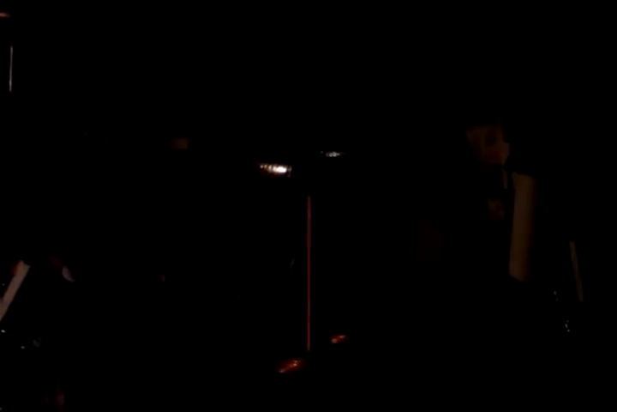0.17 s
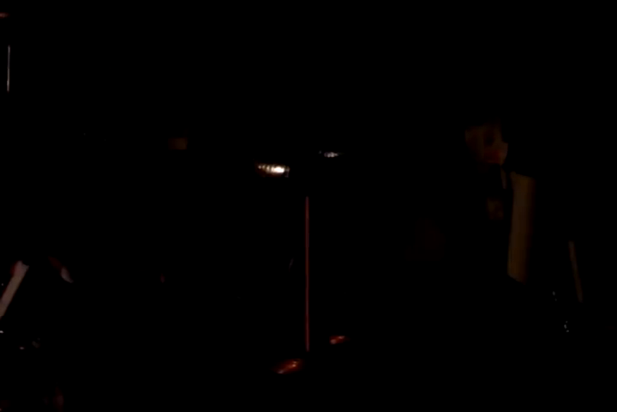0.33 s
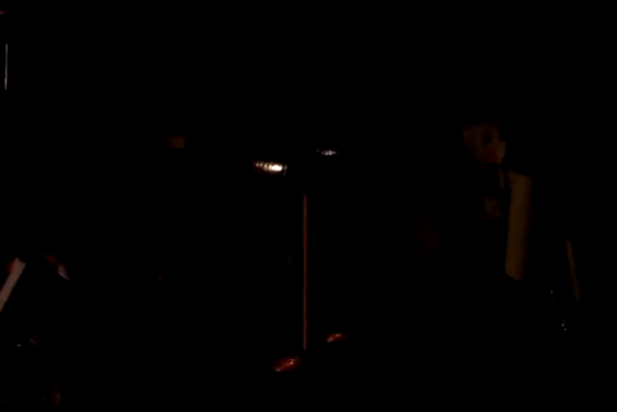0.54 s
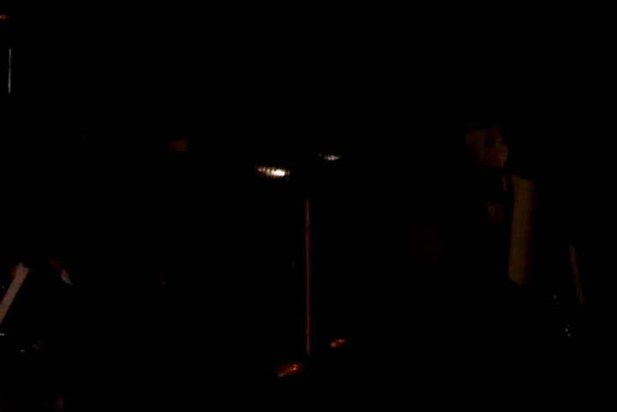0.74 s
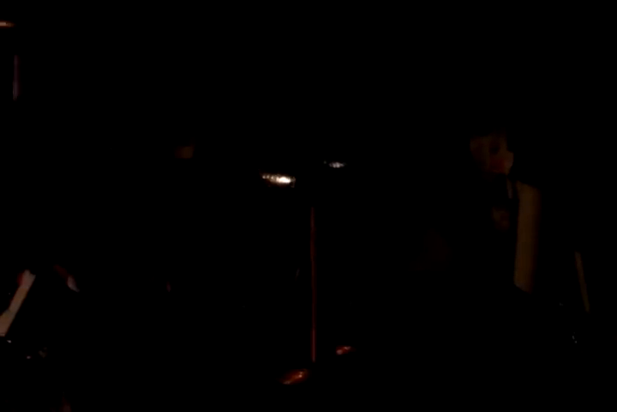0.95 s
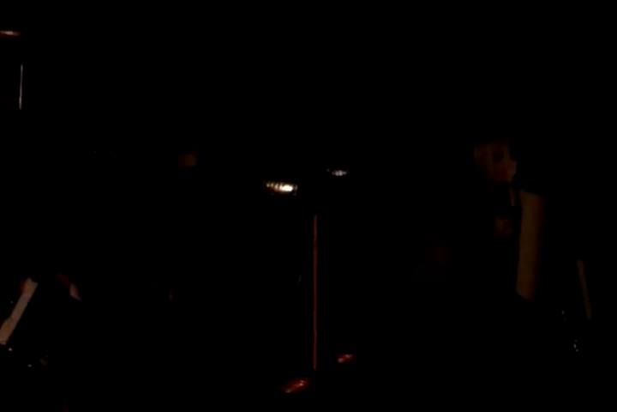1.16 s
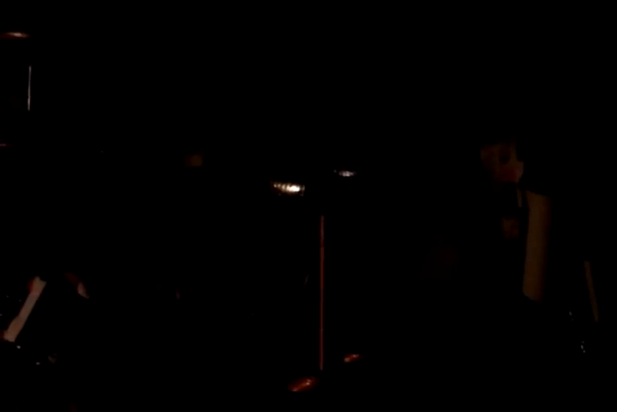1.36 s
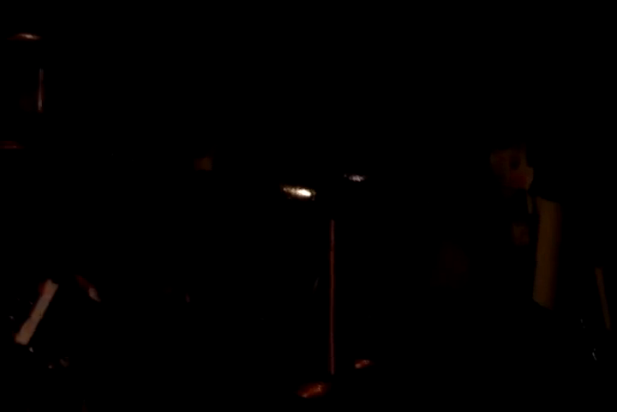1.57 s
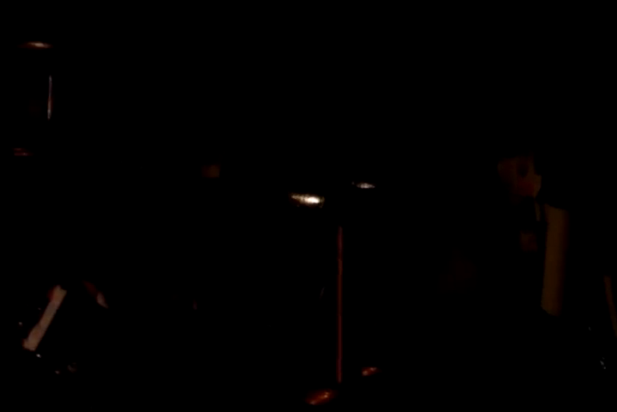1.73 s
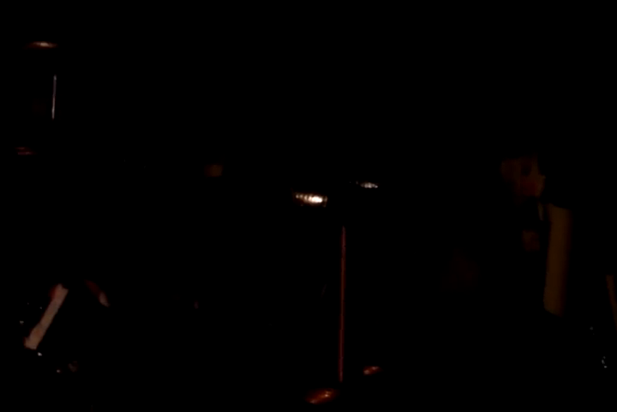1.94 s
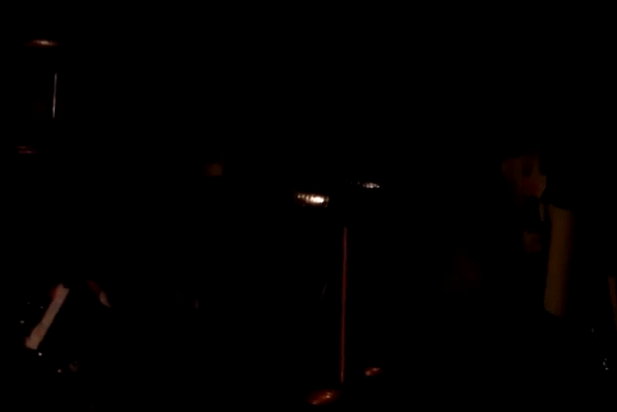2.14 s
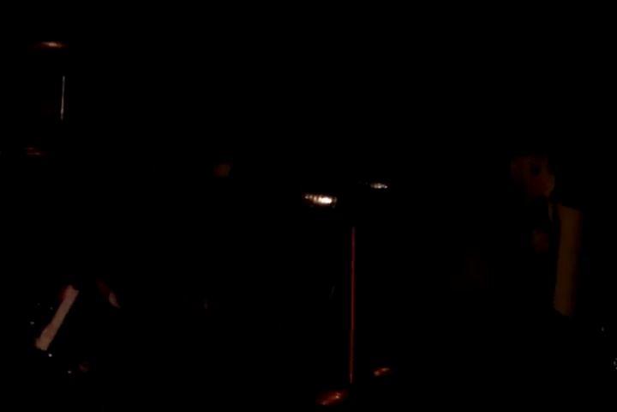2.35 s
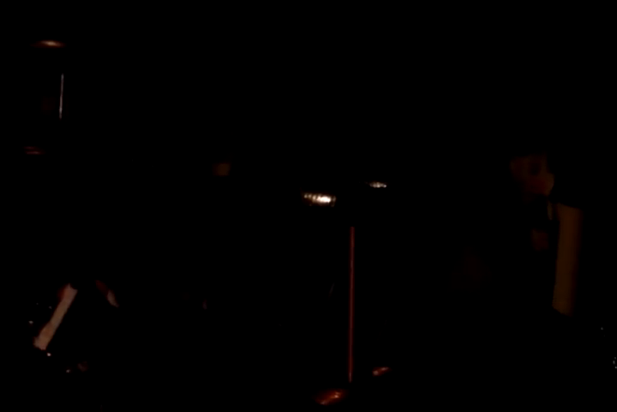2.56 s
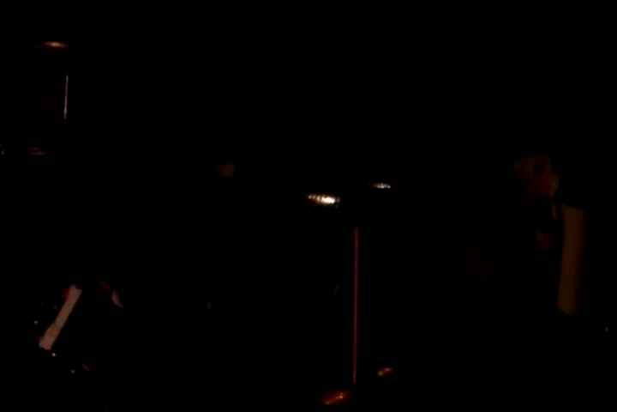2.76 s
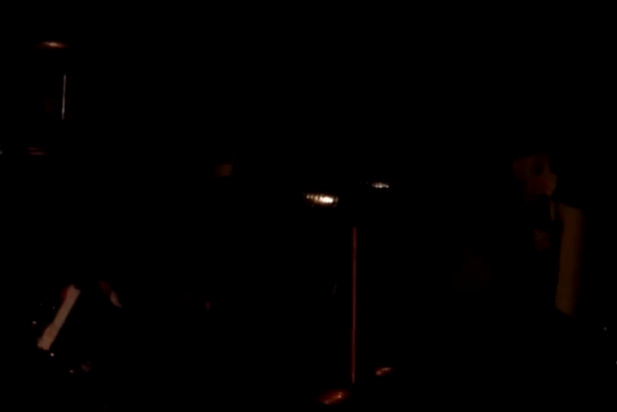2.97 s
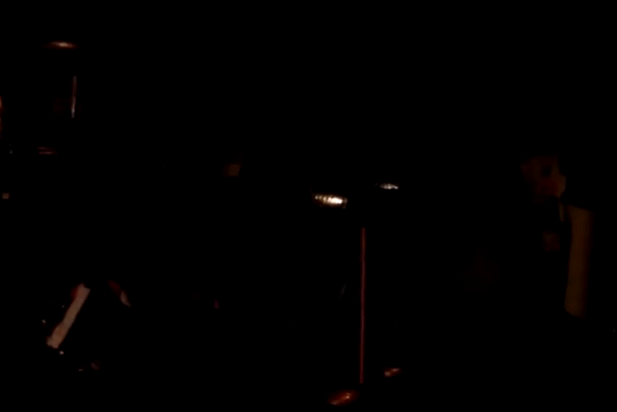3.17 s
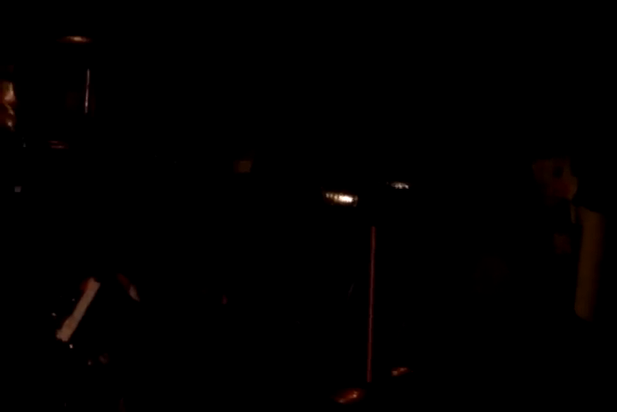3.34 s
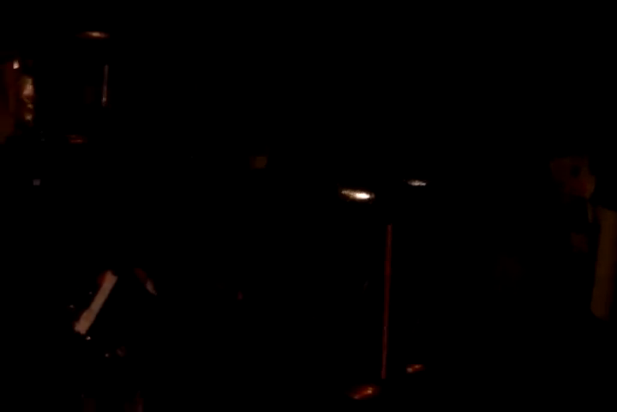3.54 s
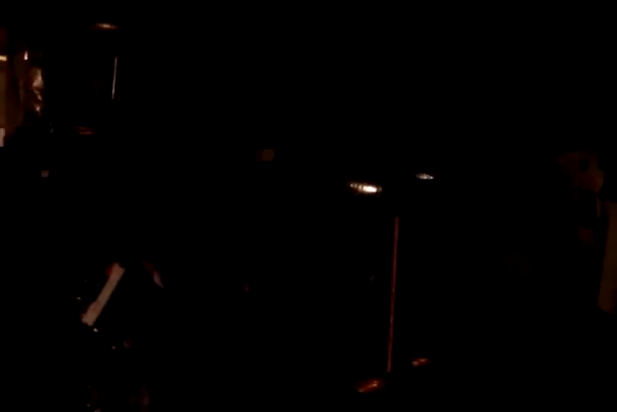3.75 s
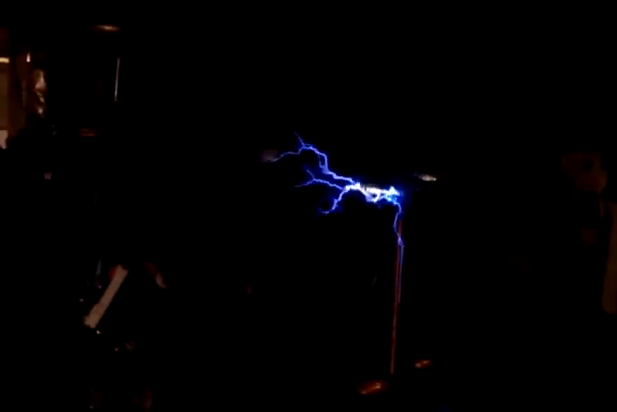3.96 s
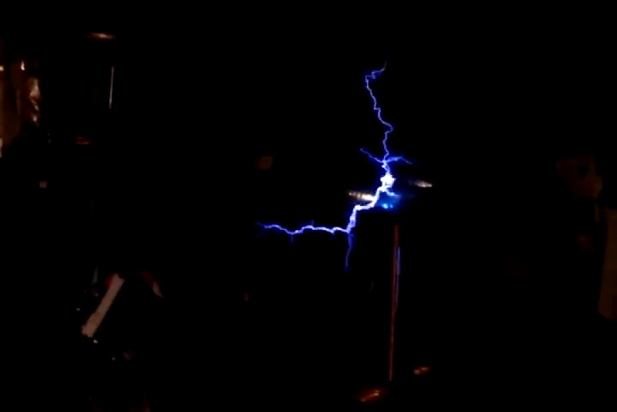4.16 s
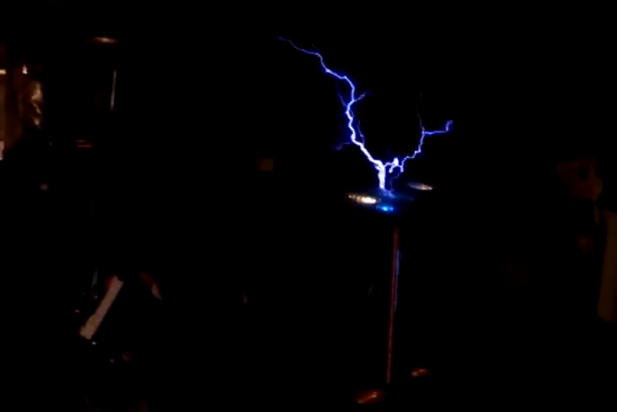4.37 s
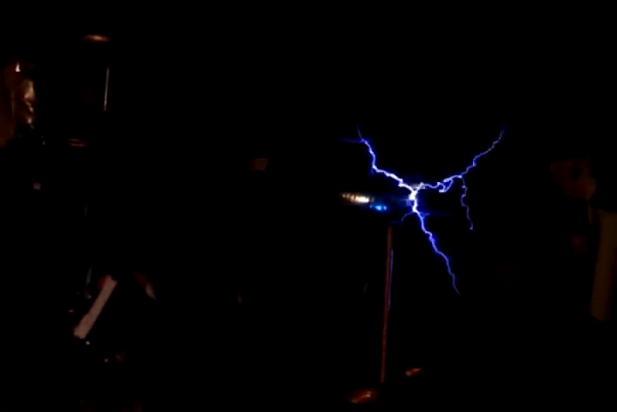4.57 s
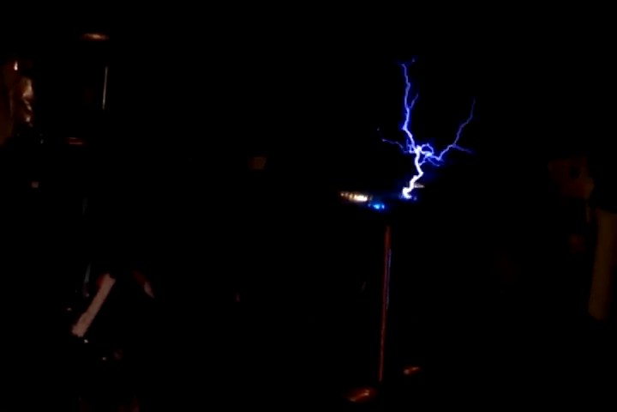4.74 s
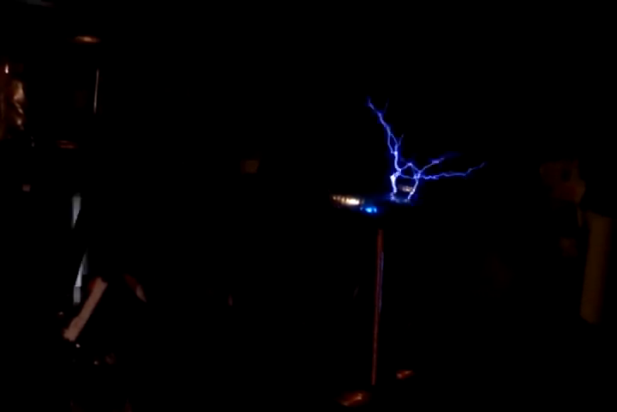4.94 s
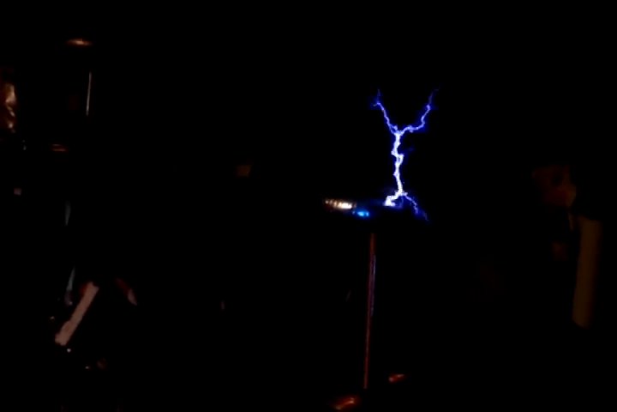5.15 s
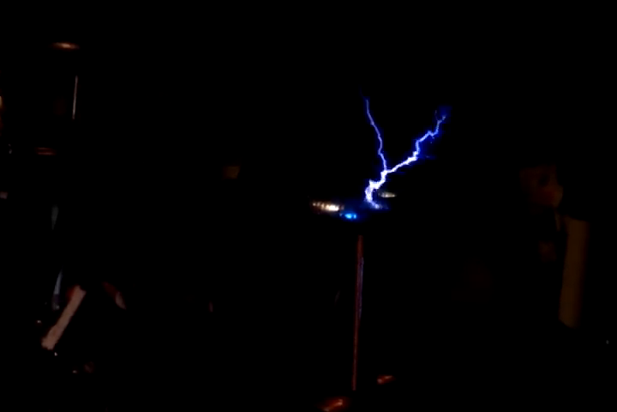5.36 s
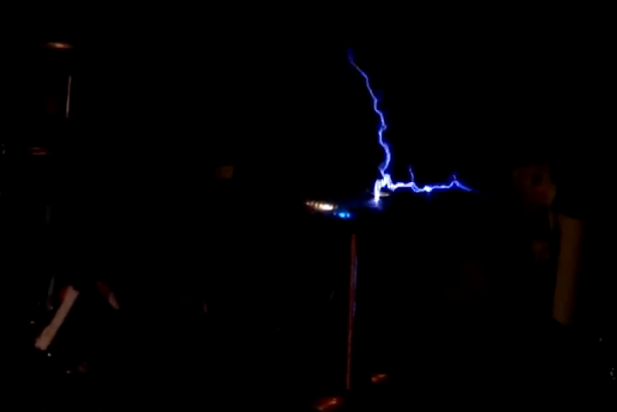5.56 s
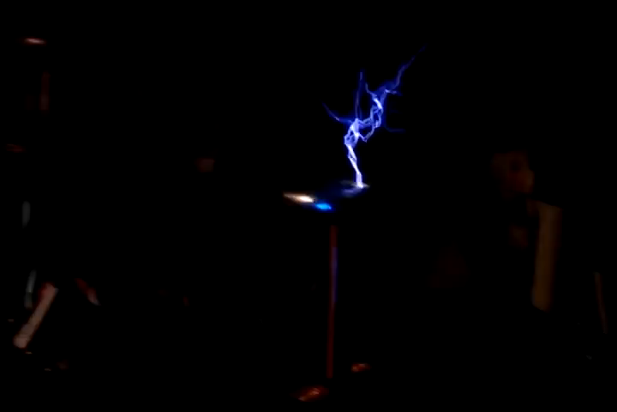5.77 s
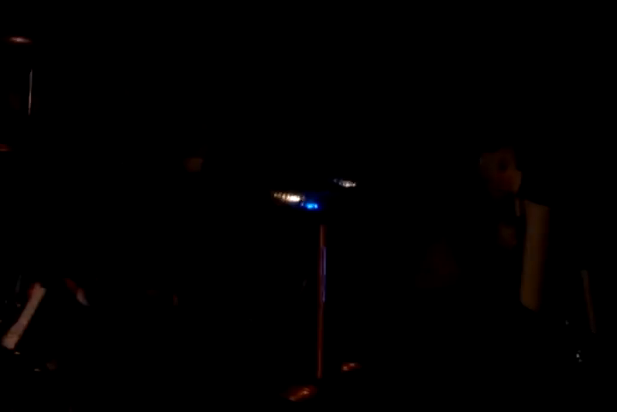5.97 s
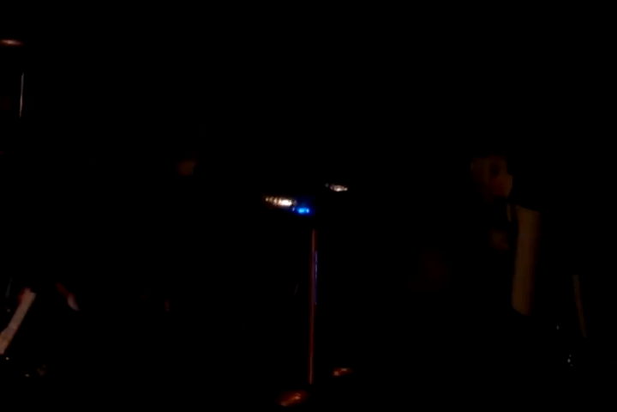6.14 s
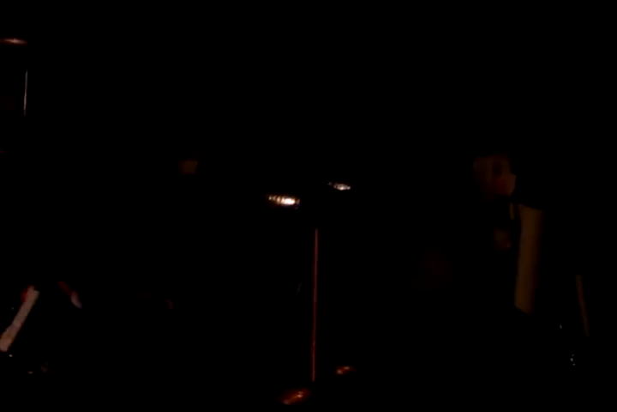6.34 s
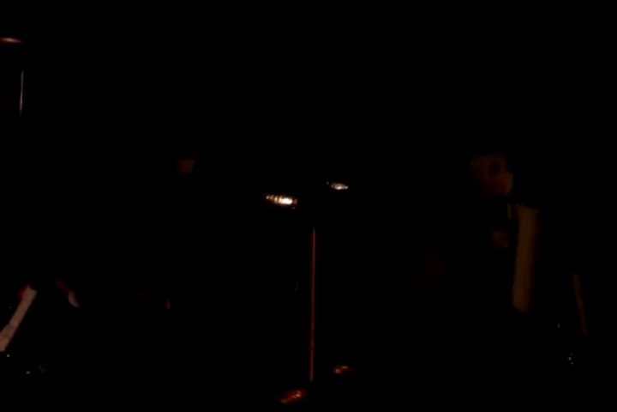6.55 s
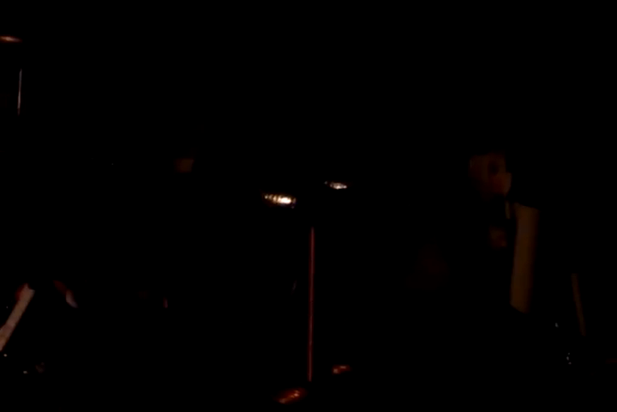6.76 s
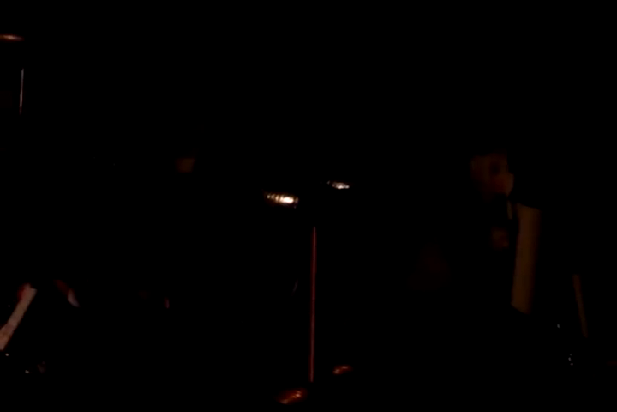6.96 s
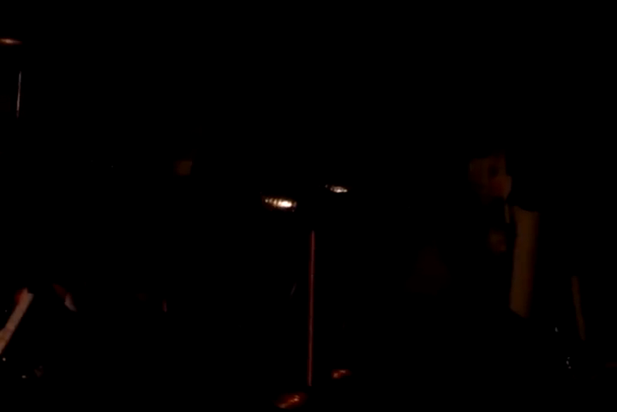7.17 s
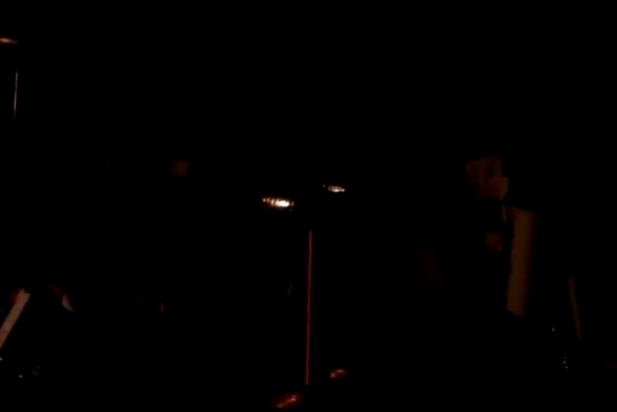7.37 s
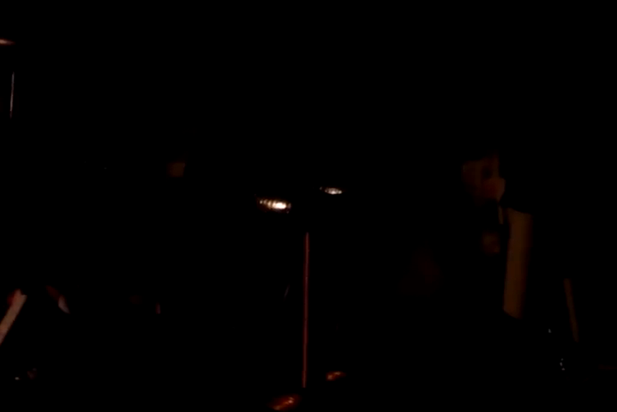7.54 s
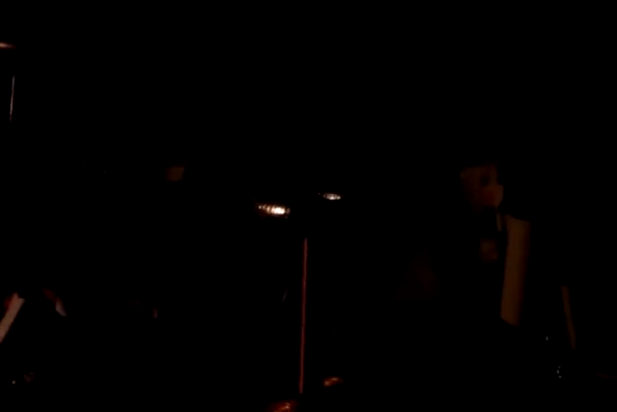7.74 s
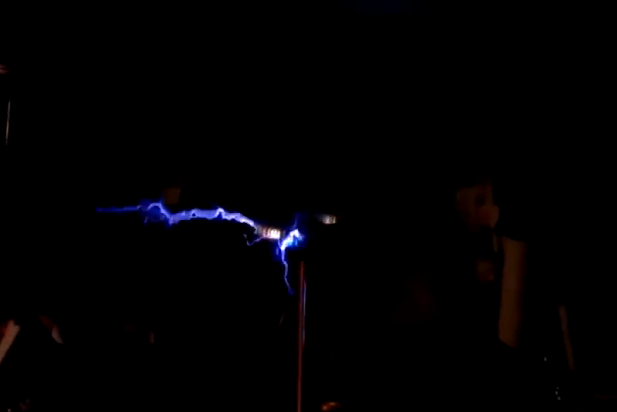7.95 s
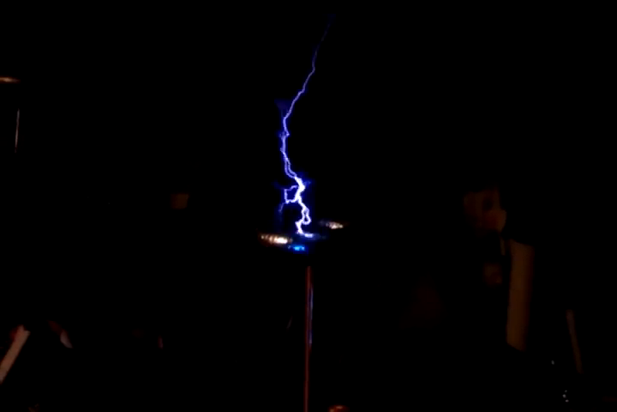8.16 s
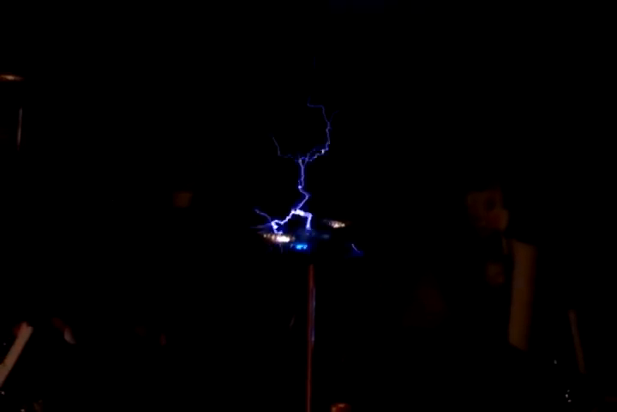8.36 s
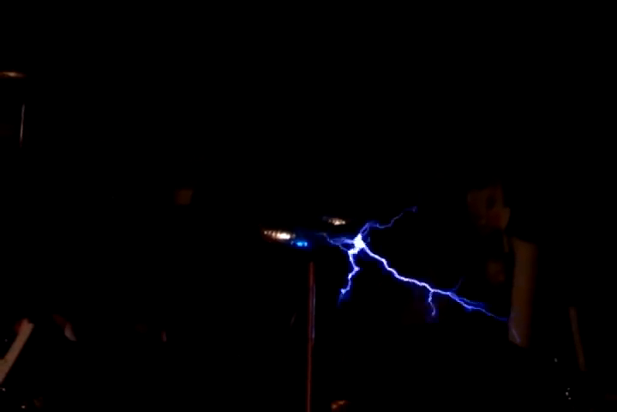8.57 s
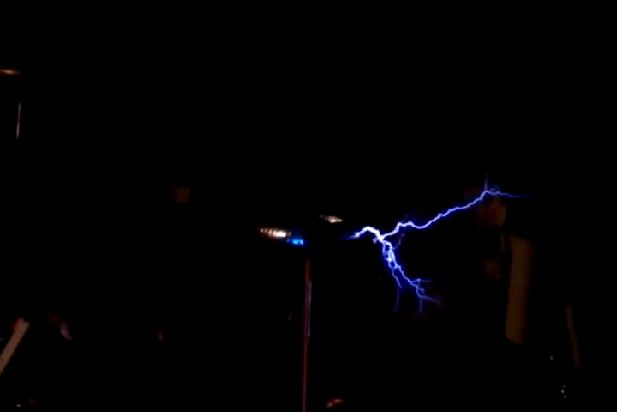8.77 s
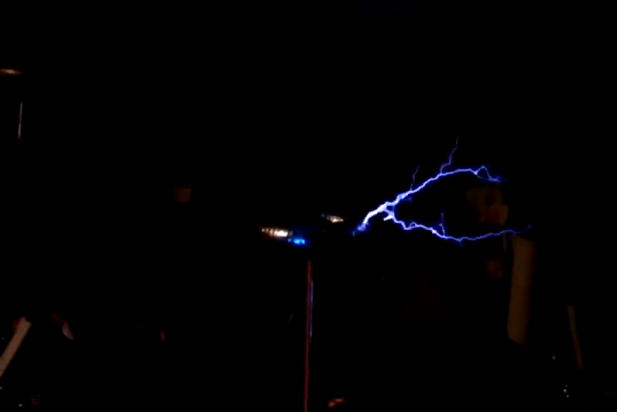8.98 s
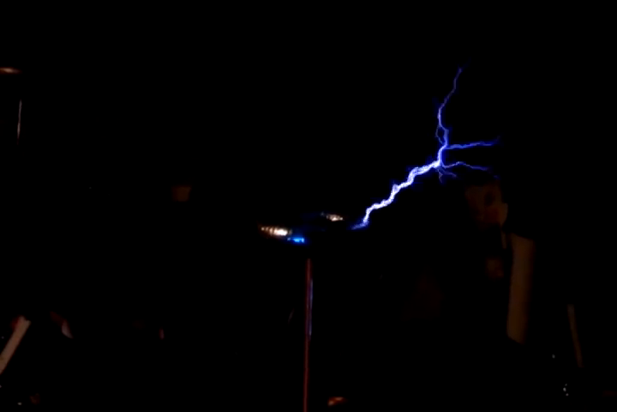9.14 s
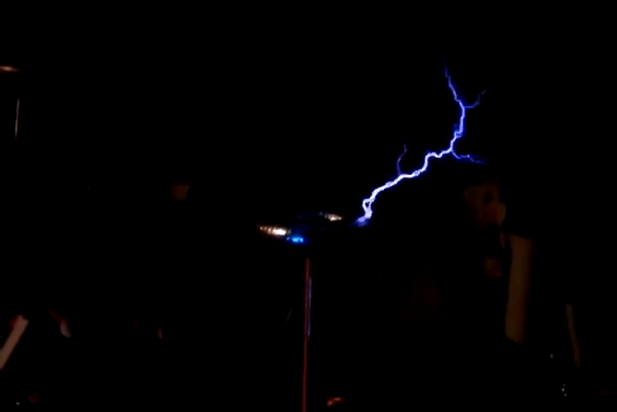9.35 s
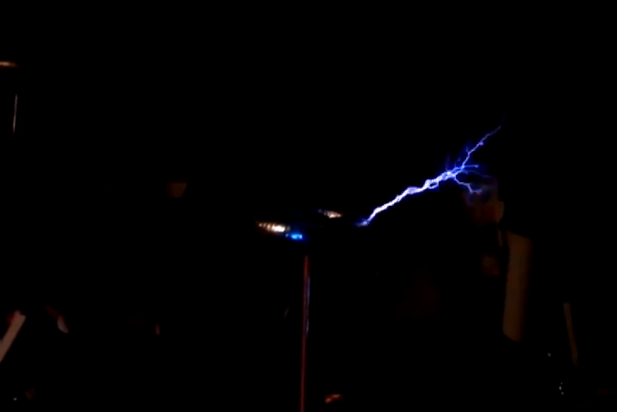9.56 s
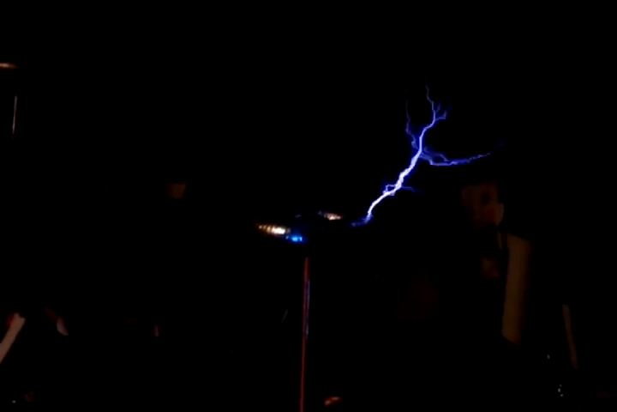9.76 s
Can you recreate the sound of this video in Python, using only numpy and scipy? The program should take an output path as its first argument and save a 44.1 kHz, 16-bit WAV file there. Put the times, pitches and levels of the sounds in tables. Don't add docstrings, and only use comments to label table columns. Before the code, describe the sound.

Steady motor whine and airy blower noise, broken by two harsh runs of loud buzzing, crackling electric arcs, each ducking the whine afterwards.

```python
import sys
import numpy as np
from scipy import signal
from scipy.fft import rfft, irfft, next_fast_len
from scipy.io import wavfile

SR = 44100
rng = np.random.default_rng(int(sys.argv[2]) if len(sys.argv) > 2 else 0)


def log_audio(samples):
    frames = np.atleast_2d(samples).T
    limited = np.clip(frames, -1, 1)
    pcm = np.round(limited * 32767).astype(np.int16)
    wavfile.write(sys.argv[1], SR, pcm)


def magnitude_from_level(level_db):
    exponent = np.asarray(level_db, float) / 20
    return 10 ** exponent


N = 432621
LEAD_S = .4
MAINS_BEAT_HZ = 119.9


def clock():
    return np.arange(-round(LEAD_S * SR), N) / SR


def rms_one(x):
    return x / np.sqrt(np.mean(x ** 2) + 1e-20)


def at_hz(points, hz):
    point_hz, value = np.array(points).T
    return np.interp(np.log(hz + 1), np.log(point_hz), value)


def coloured(x, points, lifts=()):
    length = x.shape[-1]
    size = next_fast_len(length)
    hz = np.arange(size // 2 + 1) * SR / size
    level_db = at_hz(points, hz)
    for centre, width, lift_db in lifts:
        level_db = level_db + lift_db / (1 + (2 * (hz - centre) / width) ** 2)
    return irfft(rfft(x, size) * magnitude_from_level(level_db), size)[..., :length]


def resonance(x, hz, width_hz):
    r = np.exp(-np.pi * width_hz / SR)
    top = (1 - r * r) / 2
    return signal.lfilter([top, 0, -top], [1, -2 * r * np.cos(2 * np.pi * hz / SR), r * r], x)


def filtered(x, order, hz, kind="low"):
    return signal.sosfilt(signal.butter(order, hz, kind, fs=SR, output="sos"), x)


def drift(rate_hz):
    slow = resonance(rng.standard_normal(len(clock())), rate_hz, rate_hz)
    return rms_one(resonance(slow, rate_hz, 2 * rate_hz))


def fading(since_s, time_s):
    return np.exp(-np.maximum(since_s, 0) / time_s) * (since_s >= 0)


MOTOR_HZ = [
    693.9,
    1387.8,
    2081.7,
    404.6,
]
# level in dB, share that differs between left and right in dB.
MOTOR_TONES = [(1, -18), (-23.5, -15), (-33.5, -2), (-15, -21)]


def motor():
    t, out = clock(), 0
    wander_s = .00006 * drift(2.63)
    for hz, (db, side_db) in zip(MOTOR_HZ, MOTOR_TONES):
        phase = 2 * np.pi * hz * (t + wander_s)
        swell = np.sqrt(2) * magnitude_from_level(db - 3 + 0.58 * drift(6.6))
        side = magnitude_from_level(side_db) * np.sin(phase - .2) * [[1], [-1]]
        out = out + swell * (np.sin(phase) + side)
    return out


# frequency in Hz, width in Hz, level in dB.
HOUSING = [(134.2, 10.4, -18), (195, 25, -26), (389, 27, -25), (402, 20, -24), (504.4, 42, -22),
           (1025, 25, -27), (1097, 22, -29), (1192, 32, -22.5), (1932, 27, -32), (3600, 150, -32.5),
           (8380, 300, -36)]
# frequency in Hz, density in dB per Hz.
BLOWER_NEAR = [(25, -36), (80, -5), (130, 4.5), (350, 1.5), (800, -5), (1300, -12), (2200, -28.5),
               (4000, -25), (7000, -44.5), (16000, -30.5)]
# frequency in Hz, density in dB per Hz.
BLOWER_DIFFUSE = [(60, -24), (130, -7), (500, -21), (1200, -10), (1800, -5), (2800, -13), (4000, -18),
                  (6500, -23), (8000, -19.5), (10000, -23), (11800, -28), (15500, -24.5)]


def blower():
    air = rng.standard_normal((4, len(clock())))
    near = magnitude_from_level(-16) * rms_one(coloured(air[1], BLOWER_NEAR))
    for hz, width, db in HOUSING:
        ring = resonance(resonance(air[0], hz, width), hz, 2 * width)
        near = near + magnitude_from_level(db) * rms_one(ring)
    diffuse = magnitude_from_level(-13.5) * rms_one(coloured(air[2:], BLOWER_DIFFUSE))
    return near * magnitude_from_level(np.array([[.3], [-.3]])) + diffuse


# time in seconds, level in dB.
SWITCH = [
    (-.4, -30),
    (3.9035, -10),
    (7.9112, -14),
]
# first arc in seconds, arcs steady in seconds, power off in seconds,
# shortfall while the arc catches in dB.
RUNS = [
    (-.39, -.38, -.045, 0),
    (3.9322, 4.008, 6.29, -5.5),
    (7.9502, 7.972, 9.9, -1.5),
]
GAIN_TOP_DB, GAIN_ARC_DB, SNAP_LIMIT_DB = -14.4, -37.5, -32.5
DUCK_LAG_S, DUCK_S, RECOVER_DB_PER_S = .002, .012, 9.8


def gain_control():
    t = clock()
    db = np.full(len(t), float(GAIN_TOP_DB))
    for (closed, snap_db), (struck_s, _, off, _) in zip(SWITCH, RUNS):
        above_arc_db = SNAP_LIMIT_DB - snap_db - GAIN_ARC_DB
        ducked = GAIN_ARC_DB + above_arc_db * fading(np.maximum(t - struck_s, 0), DUCK_S)
        recovering = ducked + RECOVER_DB_PER_S * np.maximum(t - off, 0)
        db = np.where(t >= closed + DUCK_LAG_S, np.minimum(db, recovering), db)
    return magnitude_from_level(db)


def struck(events):
    clicks = np.full(len(clock()), 1e-18)
    for s, db in events:
        clicks[round((s + LEAD_S) * SR)] = magnitude_from_level(db)
    return clicks


# frequency in Hz, time to fall 60 dB in seconds.
ROOM_T60 = [(500, 0.15), (3000, 0.13), (8000, 0.28), (15000, .24)]


def room(x):
    t, echoes = np.arange(SR // 2) / SR, 0
    edges = np.geomspace(150, 19200, num=8)
    for low, high in zip(edges, edges[1:]):
        band = filtered(rng.standard_normal((2, len(t))), 2, [low, high], "band")
        t60 = at_hz(ROOM_T60, np.sqrt(low * high))
        echoes = echoes + band * magnitude_from_level(-60 * t / t60) / np.sqrt(t60)
    echoes = echoes / np.sqrt(np.sum(echoes ** 2) / 2)
    return signal.fftconvolve(x[None], echoes, axes=1)[:, :len(x)]


def switch():
    rattle = signal.lfilter(rng.standard_normal(130) * np.hanning(130), [1], struck(SWITCH))
    body = resonance(resonance(rattle, 5400, 2500), 5400, 1500)
    snap = magnitude_from_level(-2) * body + magnitude_from_level(-7) * resonance(rattle, 8500, 4000)
    return snap + magnitude_from_level(-10) * room(snap)


def grains(per_s, beat, spread_db, channels):
    t = clock()
    density = per_s * np.clip(1 + beat * np.cos(2 * np.pi * MAINS_BEAT_HZ * t), 0, None) / SR
    shape = (channels, len(t))
    size_db = spread_db * np.minimum(rng.exponential(1, shape), 4)
    sizes = magnitude_from_level(size_db) * rng.choice([-1, 1], shape)
    return rms_one(sizes * (rng.random(shape) < density))


SAG_DB_PER_S = .5


def spark_power():
    leak_db, spark_db, flash_db, flash_s = -27.5, -17, 9, .004
    t, gain = clock(), 0
    for (closed, _), (struck_s, steady, off, short_db) in zip(SWITCH, RUNS):
        leak = closed + .016
        corona = magnitude_from_level(leak_db + flash_db * fading(t - leak, flash_s))
        gain = gain + corona * (t >= leak) * (t < struck_s)
        db = spark_db + short_db * (t < steady) + flash_db * fading(t - struck_s, flash_s)
        gain = gain + magnitude_from_level(db - SAG_DB_PER_S * (t - struck_s)) * (t >= struck_s) * (t < off)
    return gain


# frequency in Hz, density in dB per Hz.
SPARK_COLOUR = [(300, -0.5), (1500, -6), (3000, -6), (6500, -10.5), (8000, -9), (9500, -4.5), (11500, -7),
                (13500, -1.5), (15300, -1.5)]
# frequency in Hz, width in Hz, lift in dB.
SPARK_RINGS = [(7620, 180, 4.5), (8430, 580, 2), (14400, 500, 0.5), (15030, 330, 5.5)]
# time in seconds, level in dB.
FIRST_SPARKS = [
    (3.9325, 1),
    (3.944, -2),
    (3.968, -6),
    (7.9505, 2),
]


def sparks():
    cracks = grains(2500, beat=.5, spread_db=1.5, channels=2) * magnitude_from_level(0.37 * drift(6.2))
    cracks = spark_power() * cracks + magnitude_from_level(6) * struck(FIRST_SPARKS)
    place = rng.integers(0, 4, size=cracks.shape[1])
    echoes = sum(room(cracks[0] * (place == k)) for k in range(4))
    return magnitude_from_level(4) * coloured(magnitude_from_level(-1.5) * cracks + magnitude_from_level(1.0) * echoes, SPARK_COLOUR, SPARK_RINGS)


def thump_power():
    t, gain = clock(), 0
    for struck_s, steady, off, short_db in RUNS:
        db = -20.8 + 1.4 * short_db * (t < steady)
        db = db + 3.5 * fading(t - steady, .025)
        db = db - 6 * fading(off - t, .012)
        gain = gain + magnitude_from_level(db - SAG_DB_PER_S * (t - struck_s)) * (t >= struck_s) * (t < off)
    return gain


# time in seconds, level in dB.
FIRST_SHOVES = [(3.9345, -4), (3.9435, -3), (3.951, -10), (3.968, -6), (3.9845, -6), (4.001, -2),
                (4.0035, -3), (4.0095, -3)]


def overload():
    gain, first = thump_power(), struck(FIRST_SHOVES)
    shoves = grains(800, beat=.7, spread_db=3.0, channels=2) * magnitude_from_level(0.94 * drift(6.4) + 1.5 * drift(22))
    shoves = gain * shoves + magnitude_from_level(7) * first * [[1], [.3]]
    slide = filtered(filtered(shoves, 1, [160, 380], "band"), 2, 3000)
    sway = filtered(rng.standard_normal(shoves.shape), 2, [56, 170], "band")
    jolt = filtered(first, 2, [50, 130], "band") * [[1], [-.6]]
    return magnitude_from_level(21.5) * slide + magnitude_from_level(-0.5) * gain * rms_one(sway) + magnitude_from_level(32) * jolt


def scene():
    machine = gain_control() * (motor() + blower())
    arcs = (sparks() + overload()) * magnitude_from_level(np.array([[-1.8], [1.5]]))
    return (machine + arcs + switch())[:, -N:]


def band_limit(x):
    return signal.sosfilt(signal.butter(12, 16850, fs=SR, output="sos"), x)


def record(dry):
    lag = 16
    late = np.pad(dry[::-1], ((0, 0), (lag, 0)))[:, :N]
    wide = dry - late * [[.69], [.98]]
    limited = 1.318 * np.tanh(wide / 1.297)
    mix = signal.sosfilt(signal.ellip(14, .5, 70, 15470, fs=SR, output="sos"), limited)
    return band_limit(mix)


dry = scene()
out = record(dry)
log_audio(out)
```